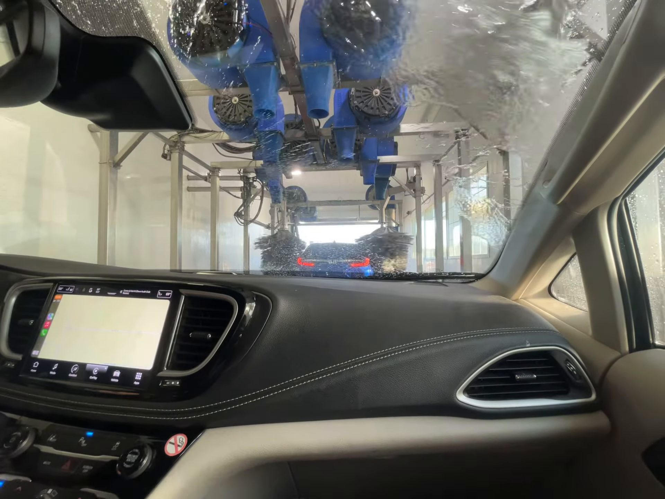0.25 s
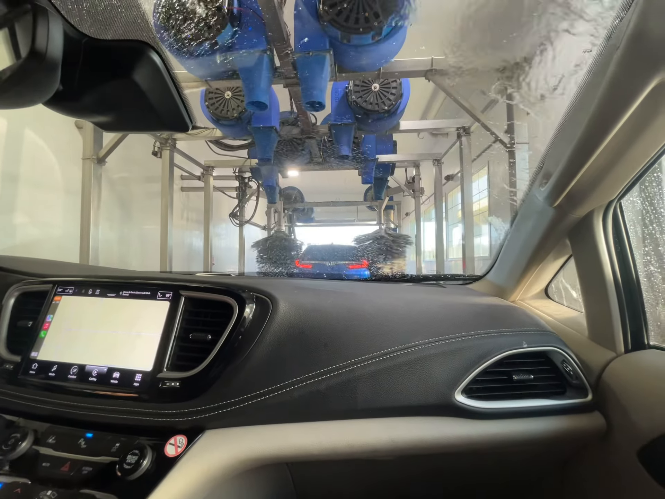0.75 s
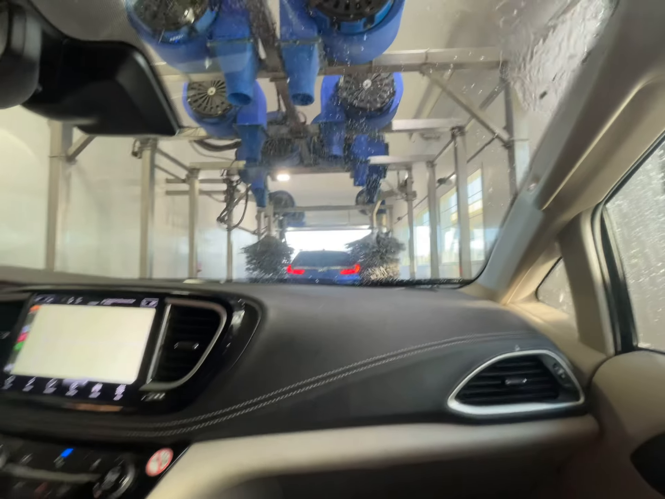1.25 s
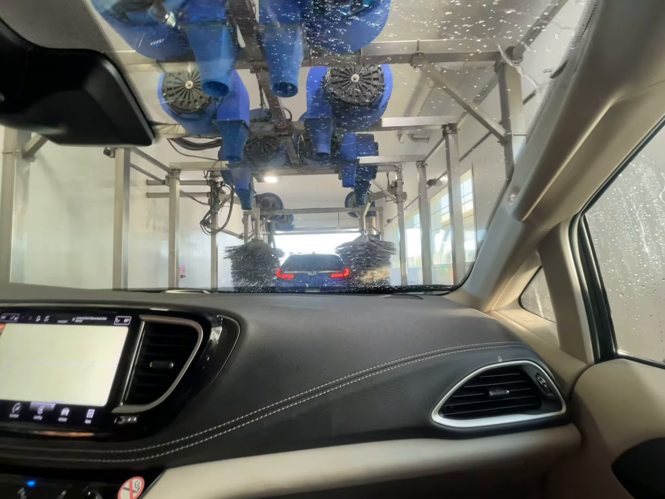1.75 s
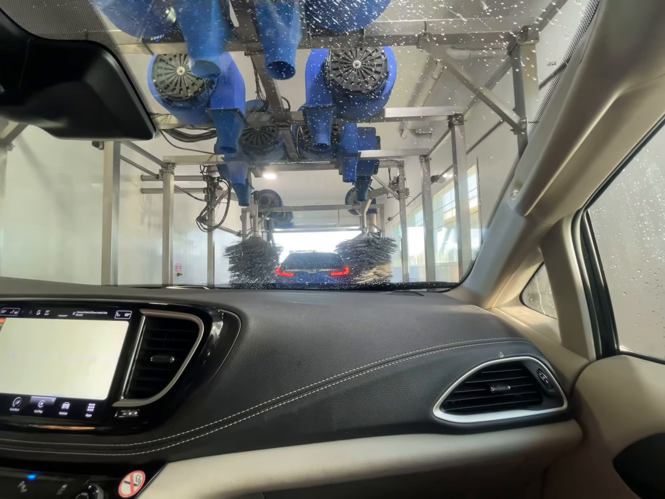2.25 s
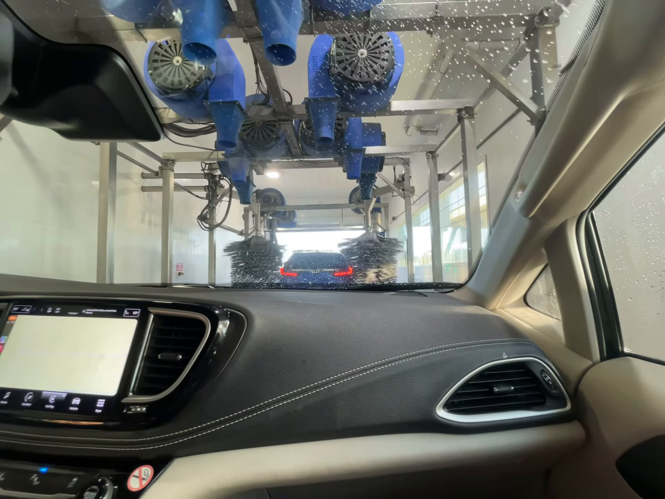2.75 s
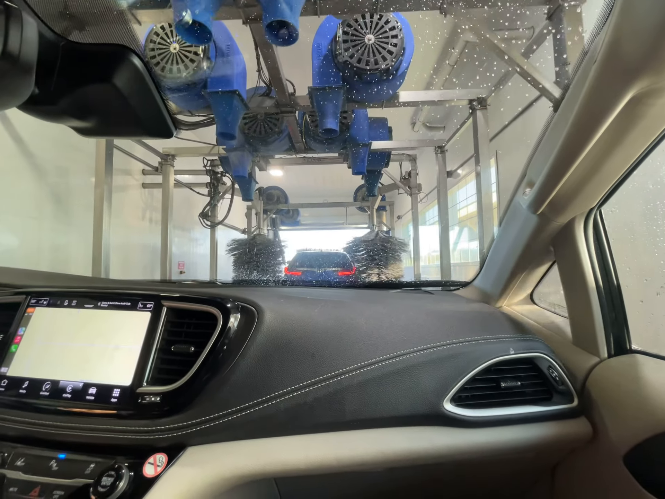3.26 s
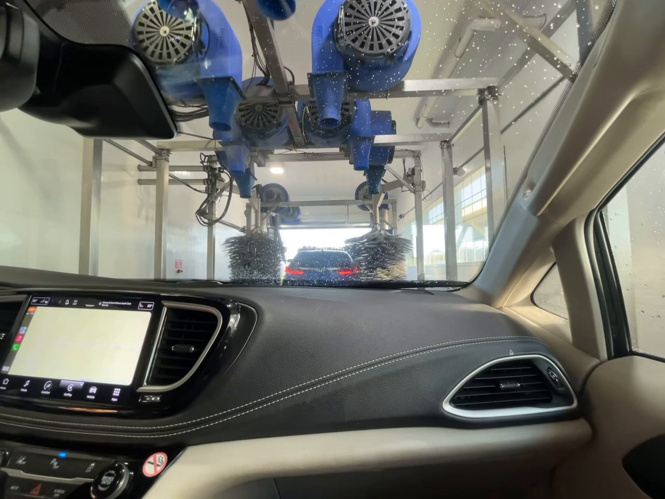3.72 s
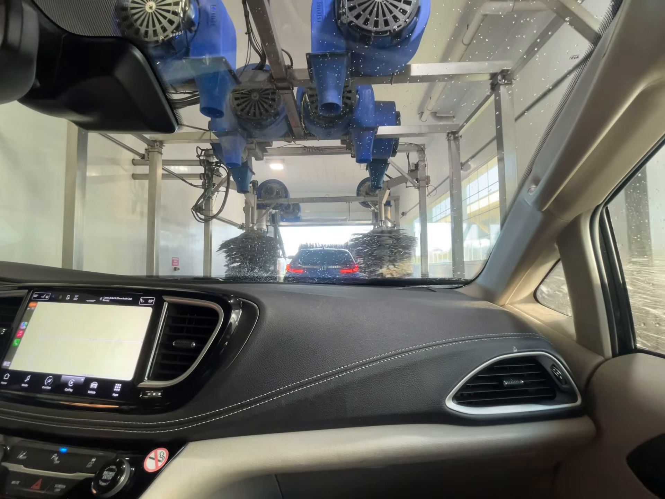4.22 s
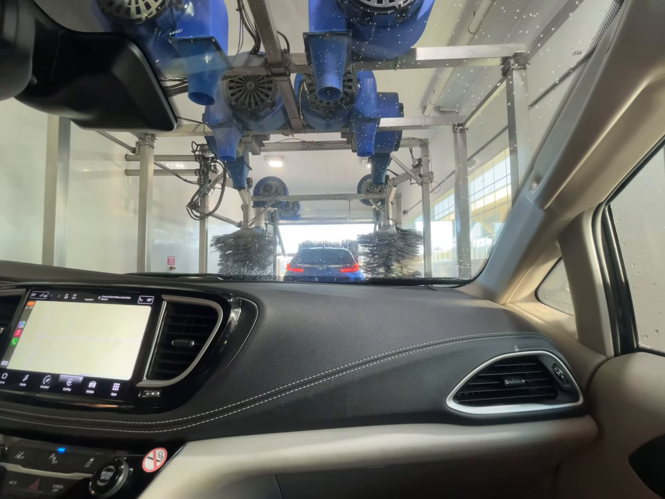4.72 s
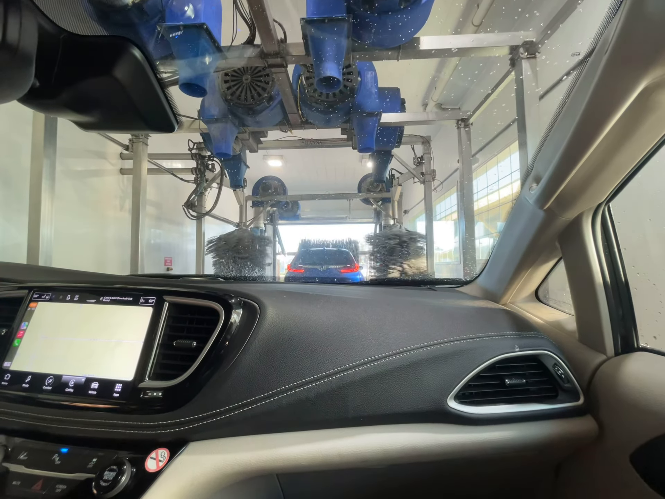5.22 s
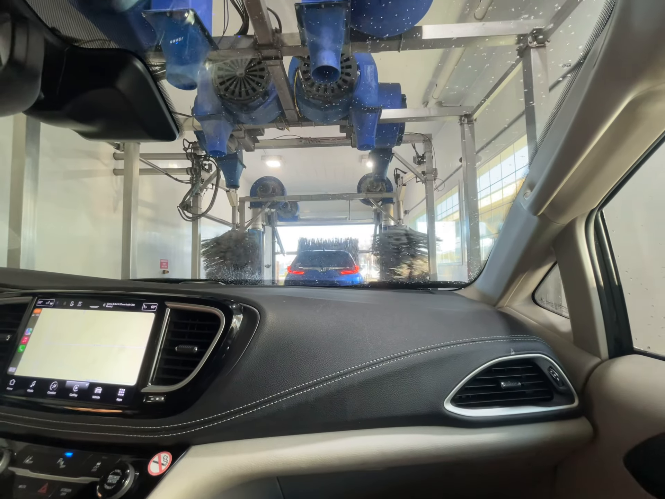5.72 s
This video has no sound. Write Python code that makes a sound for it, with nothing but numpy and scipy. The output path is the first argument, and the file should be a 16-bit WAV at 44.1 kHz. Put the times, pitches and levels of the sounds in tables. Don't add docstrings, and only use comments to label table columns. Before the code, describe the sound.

Low buffeting air shakes a car's roof and windows from within, swelling after about a second and a half, with faint hiss and sparse water ticks.

```python
import sys
import numpy as np
from scipy import signal
from scipy.fft import rfft, irfft, next_fast_len
from scipy.io import wavfile
from scipy.ndimage import uniform_filter1d, minimum_filter1d

SR = 44100
rng = np.random.default_rng(int(sys.argv[2]) if len(sys.argv) > 2 else 0)


def invert_db(x):
    u = np.asarray(x, float) / 20
    return 10 ** u


def wav_out(sig):
    wavfile.write(sys.argv[1], SR, np.round(np.clip(np.atleast_2d(sig).T, -1, 1) * 32767).astype(np.int16))


N = 263718

# (frequency [Hz], density [dB per Hz])
BUFFET = [(50, -46.5), (80, -6), (95, -5.5), (235, -4), (255, -5.5), (300, -24.5)]
# (time [s], roof level [dB], windscreen level [dB], side window level [dB], body level [dB])
GUSTS = [(.05, -6.5, 1.5, 9.5, 2), (.17, 3.5, 0.5, -2.5, -1.5), (.3, 3.5, 8, 3, 0.5), (.5, 3.5, 1.5, 4, 5),
         (.72, 3.5, -5.5, 5, 0.5), (.8, -0.5, 3.5, -6, 6.5), (.89, -10, -1, 4.5, -2), (1.06, 0, 1.5, -2, 3),
         (1.17, 0.5, -6, 3.5, 4), (1.36, 5.5, -17, 7, 1), (1.45, -2.5, 3.5, -9.5, 5),
         (1.63, 1, -11, -6, 3.5), (1.73, -6, 3, 7.5, -14), (1.95, -1, 6.5, -8, 0), (2.05, -2.5, 4, 2.5, -2),
         (2.149, 1.5, 3, 11, 4), (2.36, 4, -0.5, -12, 2), (2.5, 2.5, 2, 2.5, -6.5), (2.7, 0.5, -12, 7, 5),
         (2.83, 0.5, 4, 9, -1), (3.05, 0, -5.5, 6.5, 3), (3.17, 0.5, 1, -10.5, -1),
         (3.31, -3.5, -4.5, 4.5, 2), (3.5, 2, 0, 1, -3), (3.68, 4, -8, 3.5, -5), (3.9, -0.5, 5, 1, 6),
         (4.05, -2.5, 4.5, -1.5, 2.5), (4.18, 0.5, 0, -0.5, -1), (4.31, -1.5, 8, -3.5, -7.5),
         (4.45, 0, -0.5, -2.5, 1), (4.551, 1, 1, 1, 4.5), (4.68, -1, 6, -0.5, 3), (4.8, 0, 9, -11, 0.5),
         (5.08, 5, 1.5, 7.5, 2), (5.17, 1.5, 1, 5, -1), (5.36, 5.5, -4, -6.5, 1), (5.48, 2, -8.5, -2.5, -3),
         (5.61, 4.5, 4.5, -6, 3), (5.68, -7, -2, -1, -6.5), (5.76, 2.5, 0, -1, 9.5)]


def rms_one(x):
    return x / np.sqrt(np.mean(x ** 2) + 1e-20)


def coloured(spectrum):
    size = next_fast_len(N)
    hz, db = np.transpose(spectrum)
    bin_hz = np.arange(size // 2 + 1) * SR / size
    gain_db = np.interp(np.log(bin_hz + 1), np.log(hz), db, left=-200, right=-200)
    return rms_one(irfft(rfft(rng.standard_normal(size)) * invert_db(gain_db), size)[:N])


def resonate(x, modes):
    out = 0
    for k, (hz, width, db) in enumerate(modes):
        r = np.exp(-np.pi * max(width, 1) / SR)
        zeros = (1 - r * r) / 2 * np.array([1, 0, -1])
        poles = [1, -2 * r * np.cos(2 * np.pi * hz / SR), r * r]
        out = out + (-1) ** k * invert_db(db) * signal.lfilter(zeros, poles, x)
    return out


def steadied(x, span_s):
    size = max(int(span_s * SR), 1)
    power = uniform_filter1d(uniform_filter1d(x ** 2, size), size)
    return rms_one(x / np.sqrt(power + 1e-12))


def drift(rate_hz):
    r = np.exp(-80 * np.pi * rate_hz / SR)
    noise = rng.standard_normal(N // 40 + 2002)
    slow = signal.lfilter([1], [1, -2 * r, r * r], noise)[2000:]
    return np.interp(np.arange(N) / 40, np.arange(len(slow)), rms_one(slow))


def in_time(rows, lead_s=0):
    s, db = np.transpose(rows)
    return np.interp(np.arange(N) / SR, s - lead_s, db)


def bumps(rows, width_s):
    return sum(db * np.exp(-((np.arange(N) / SR - s) / width_s) ** 2) for s, db in rows)


def plateau(from_s, to_s, edge_s):
    t = np.arange(N) / SR
    return (np.tanh((t - from_s) / edge_s) - np.tanh((t - to_s) / edge_s)) / 2


def gust_db(column):
    return bumps([(row[0], row[column]) for row in GUSTS], .061)


def answer(level_db, by_pressure, by_nearness, lead_s=0):
    # (time [s], level [dB])
    pressure = [(0, -21.5), (.3, -23), (.9, -23.5), (1.4, -23.5), (1.75, -17), (2.05, -21.5), (2.4, -17),
                (2.9, -15.5), (3.15, -16.5), (3.45, -14), (3.9, -17), (4.5, -14.5), (4.9, -15.5),
                (5.3, -17.5), (5.98, -14)]
    # (time [s], level [dB])
    nearness = [(0, -47.5), (.3, -48.5), (1.5, -48.5), (2.36, -48.5), (2.48, -46), (2.65, -45), (2.88, -47),
                (3.2, -48), (3.5, -46.5), (4.0, -46), (4.3, -46), (4.7, -45.5), (5.5, -46.5), (5.98, -47)]
    pressure_swing = in_time(pressure, lead_s) + 16
    nearness_swing = in_time(nearness) + 48
    return level_db + by_pressure * pressure_swing + by_nearness * nearness_swing


def tunnel_rumble():
    # (frequency [Hz], density [dB per Hz])
    floor_spectrum = [(18, -38.5), (28, -31), (38, -5), (50, 1.5), (62, -0.5), (75, -27)]
    return invert_db(-46) * steadied(coloured(floor_spectrum), .3)


def drops():
    # (time [s], peak level [dB], pitch [Hz])
    drop_hits = [(.228, -54, 7000), (.338, -45, 7500), (.732, -54, 6800), (.915, -55, 7000),
                 (1.088, -50, 7500), (1.475, -50, 7800), (1.578, -47, 7500), (1.732, -53, 7000),
                 (1.876, -46, 7650), (3.933, -52, 7000), (4.017, -41, 8000), (4.203, -43, 7500),
                 (4.42, -51, 7200), (4.462, -49, 7900), (4.555, -43, 7450), (4.854, -50, 7000),
                 (5.719, -43, 7600), (5.798, -44, 8100), (5.911, -49, 7600)]
    attack_s, t60_s = .00091, .035
    out = np.zeros(N)
    t = np.arange(int(.04 * SR)) / SR
    for s, db, hz in drop_hits:
        splash = rng.standard_normal(len(t)) * np.minimum(t / attack_s, 1) * invert_db(-60 * t / t60_s)
        splash[0] = 5
        ring = resonate(resonate(splash, [(hz, 450, 1)]), [(hz, 2500, 0)])
        tick = ring + resonate(splash, [(6500, 5000, -11)]) + .06 * splash
        at = round(s * SR)
        out[at:at + len(t)] += invert_db(db + 2.5) * tick / np.abs(tick).max()
    dull = signal.sosfilt(signal.butter(10, 9500, fs=SR, output="sos"), out)
    return dull + invert_db(-21) * out


def blade_hum():
    # (frequency [Hz], width [Hz], level [dB])
    blade_tones = [(709, 6, 0.5), (738, 10, 0)]
    # (time [s], level [dB])
    fan_trade = [
        (0, 3),
        (1.35, 3),
        (1.55, -2),
        (2.3, -1.5),
        (2.6, 1),
        (4.4, -0.5),
        (5.98, -2),
    ]
    # (time [s], level [dB])
    hum_swells = [(.15, -2), (0.651, -8), (.95, 5), (1.05, -6), (1.25, 4), (1.55, 5), (2.1, 3.5), (2.35, 4),
                  (2.5, -7.5), (2.66, 3.5), (2.77, 7), (4.4, 3), (4.7, 3.5), (4.93, 2), (5.5, 3),
                  (5.85, -6)]
    hums = []
    for hz, width, db in blade_tones:
        tone = resonate(resonate(rng.standard_normal(N), [(hz, width, 0)]), [(hz, 60, 0)])
        hums.append(invert_db(db) * steadied(tone, .098))
    trade_db = in_time(fan_trade)
    both = rms_one(hums[0] * invert_db(-trade_db / 2) + hums[1] * invert_db(trade_db / 2))
    swell_db = bumps(hum_swells, .069) + .5 * drift(13)
    return both * invert_db(swell_db + answer(-37.5, by_pressure=.11, by_nearness=.57))


def driven_spray():
    # (frequency [Hz], density [dB per Hz])
    spray_spectrum = [(4000, -16), (4800, -0.5), (5500, -1.5), (7000, -7), (8500, -11), (9400, -16),
                      (10000, -27), (10800, -34.5), (11500, -50.5)]
    thinning_db = -2 * plateau(2.3, 2.46, edge_s=.04)
    level_db = answer(-58, by_pressure=.02, by_nearness=1.1) + thinning_db
    return coloured(spray_spectrum) * invert_db(level_db + .46 * drift(14))


def nozzle_hiss():
    # (frequency [Hz], density [dB per Hz])
    hiss_spectrum = [(1100, -23.5), (1850, -4.5), (2010, -4.5), (2480, -3), (3170, -7.5), (4400, -16),
                     (5200, -25.5), (6000, -37)]
    return coloured(hiss_spectrum) * invert_db(answer(-41, by_pressure=.05, by_nearness=.96) + .2 * drift(11))


def jet_rush():
    # (frequency [Hz], density [dB per Hz])
    jet_spectrum = [(150, -17), (255, 6), (269, -4.5), (324, 3.5), (422, -3), (545, -6), (661, -6.5),
                    (722, -12.5), (862, -12.5), (1270, -17), (1450, -18), (1730, -20), (2100, -35.5),
                    (2730, -43.5), (4620, -120)]
    # (frequency [Hz], width [Hz], level [dB])
    cabin_modes = [(295.6, 17, -4), (324, 3.7, -9.5), (426.4, 51, -4.5), (522, 11, -17.5), (794, 19, -12),
                   (836, 4, -14), (1430, 98, -9), (1790, 270, -8.5)]
    # (time [s], level [dB])
    roar_gusts = [(.3, -1.5), (.7, -0.5), (1.05, 1.5), (1.7, -1), (1.9, 1), (2.1, -1), (2.3, 2.5),
                  (2.55, -1.5), (2.9, -1), (3.3, 0.5), (3.5, -2), (4.1, 2), (4.6, -0.5), (4.95, 1.5),
                  (5.1, 1.5), (5.7, -0.5)]
    jet = coloured(jet_spectrum)
    jet = jet + sum(resonate(jet, [mode]) for mode in cabin_modes)
    roar = signal.sosfiltfilt(signal.butter(2, 600, fs=SR, output="sos"), jet)
    rush = jet - roar
    sweep_db = bumps([(2.87, 3)], .92)
    roar_db = answer(-27.5, by_pressure=.35, by_nearness=.17) + sweep_db + bumps(roar_gusts, .089)
    rush_db = answer(-32.5, by_pressure=.11, by_nearness=.57)
    return invert_db(roar_db) * steadied(roar, .48) + invert_db(rush_db) * steadied(rush, .34)


def body_shake():
    # (frequency [Hz], density [dB per Hz])
    shake_spectrum = [(12, -27), (25, -26), (33, -26.5), (42, -25), (55, 0), (70, 2), (85, 9), (100, -9.5),
                      (130, -29.5)]
    held_db = -7.5 * plateau(1.3, 3.5, edge_s=.08)
    level_db = answer(-23.5, by_pressure=.23, by_nearness=.05) + held_db + gust_db(4)
    return steadied(coloured(shake_spectrum), .079) * invert_db(level_db + .46 * drift(4.3))


def window_boom():
    # (frequency [Hz], width [Hz], level [dB])
    glass_modes = [(143, 26.3, 2), (174, 19.3, 3.5)]
    # (frequency [Hz], width [Hz], level [dB])
    side_modes = [(196.2, 56.6, -1.5), (233.7, 44, -5.5)]
    # (time [s], level [dB])
    side_runoff = [
        (.35, 3),
        (5.45, -1),
    ]
    lead_s = .12
    buffet = coloured(BUFFET)
    glass_db = answer(-20.5, by_pressure=1, by_nearness=.051, lead_s=lead_s) + gust_db(2) + .38 * drift(1.7)
    glass = steadied(resonate(buffet, glass_modes), .24) * invert_db(glass_db)
    cleared_db = -6 * (1 + np.tanh((np.arange(N) / SR - 5.55) / .47)) / 2
    side_db = answer(-24.5, by_pressure=.84, by_nearness=.05, lead_s=lead_s) + gust_db(3)
    side_db = side_db + bumps(side_runoff, .15) + cleared_db
    sides = steadied(resonate(resonate(buffet, side_modes), [(221, 90, 0)]), .19) * invert_db(side_db)
    return glass - sides


def roof_boom():
    # (frequency [Hz], width [Hz], level [dB])
    roof_modes = [(89.4, 10, -16.5), (105.7, 13.4, 2), (120, 38, -4)]
    level_db = answer(-15.5, by_pressure=1.32, by_nearness=.046) + gust_db(1)
    return steadied(resonate(coloured(BUFFET), roof_modes), .14) * invert_db(level_db + .79 * drift(7.5))


def shell():
    # (time [s], level [dB])
    flutter = [(0.058, -7), (0.114, 6), (0.158, -4), (0.193, 4.0), (1.0, -6), (1.051, 4.5), (1.124, -5.5),
               (1.24, 2), (1.294, -6), (1.389, 5), (1.659, 7), (1.915, -5.5), (1.953, 6), (2.336, -6),
               (2.388, 6), (2.439, 4.0), (2.544, 2.5), (2.997, 5), (3.054, -6.0), (3.38, 6), (3.47, 2),
               (3.506, -4.0), (3.639, -5.0), (3.92, -2), (3.996, 4.5), (4.806, 1), (4.89, -5.0), (5.447, 6.5),
               (5.548, -3), (5.617, 1.5), (5.842, -3.5)]
    # (time [s], level [dB])
    dips = [
        (.888, -10),
        (1.975, -3),
        (3.305, -4),
        (4.315, -5),
        (5.68, -1),
        (5.91, -2),
        (5.965, -5),
    ]
    boom = body_shake() + window_boom() + roof_boom()
    return boom * invert_db(bumps(flutter, .015) + bumps(dips, .016))


def scene():
    air = blade_hum() + driven_spray() + nozzle_hiss() + jet_rush()
    return (tunnel_rumble() + drops() + air + shell())[None]


def limiter(x, ceiling, hold_s, smooth_s):
    smooth = max(int(smooth_s * SR), 1)
    need = np.minimum(1, ceiling / (np.abs(x) + 1e-9))
    gain = minimum_filter1d(need, smooth + max(int(hold_s * SR), 1), axis=1)
    return x * uniform_filter1d(gain, smooth, axis=1)


def low_pass(x):
    return signal.sosfilt(signal.butter(12, 15750, fs=SR, output="sos"), x)


def record(dry):
    t = np.arange(N) / SR
    x = limiter(dry, ceiling=.648, hold_s=.004, smooth_s=.006)
    power = uniform_filter1d(x ** 2, int(.06 * SR), axis=1)
    loudness = np.clip(power / .06 - .25, .25, 1)
    high_pass = signal.butter(3, 13500, "high", fs=SR, output="sos")
    grit = loudness * signal.sosfilt(high_pass, rng.standard_normal(x.shape))
    x = x * (1 + invert_db(-65) * np.cos(2 * np.pi * 12000 * t))
    x = x + invert_db(-92) * rng.standard_normal(x.shape) + invert_db(-78) * grit
    return low_pass(x)


dry = scene()
out = record(dry)
wav_out(out)
```